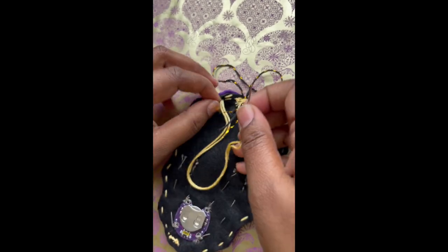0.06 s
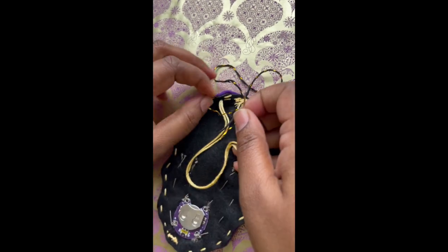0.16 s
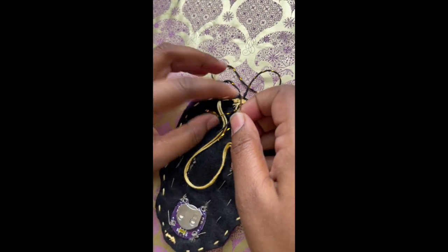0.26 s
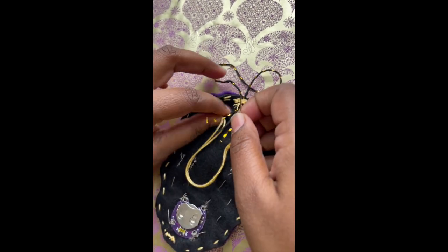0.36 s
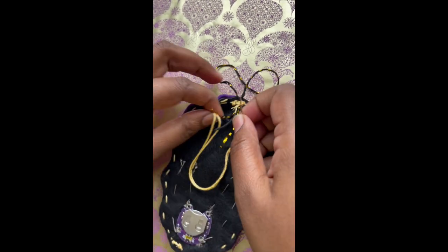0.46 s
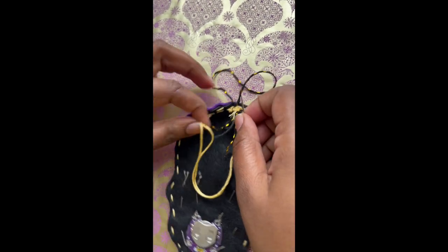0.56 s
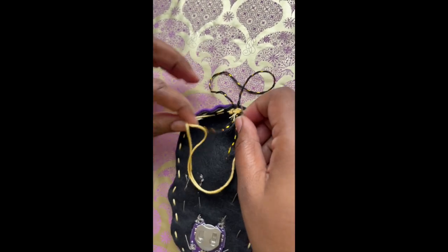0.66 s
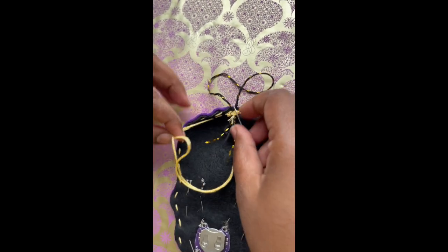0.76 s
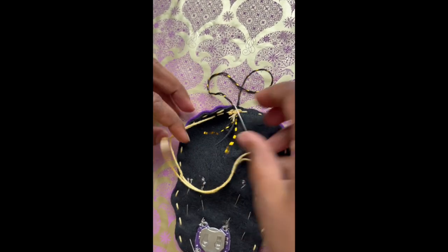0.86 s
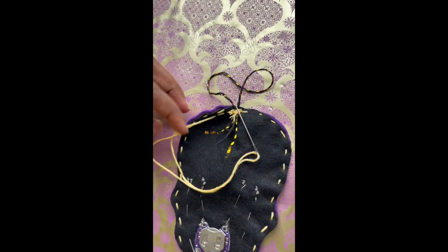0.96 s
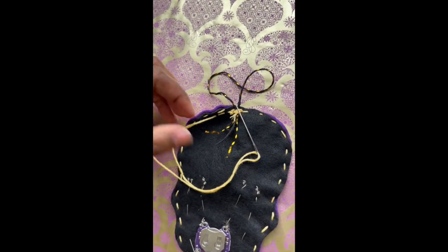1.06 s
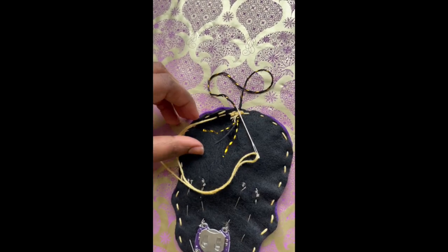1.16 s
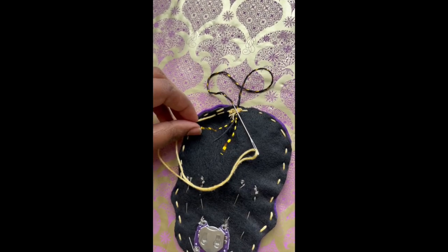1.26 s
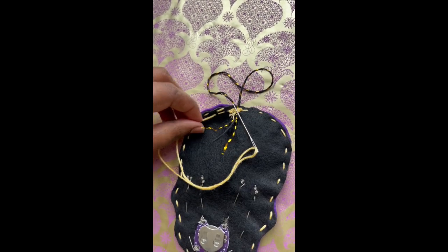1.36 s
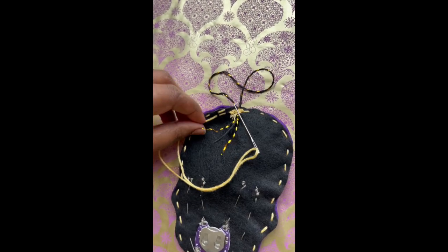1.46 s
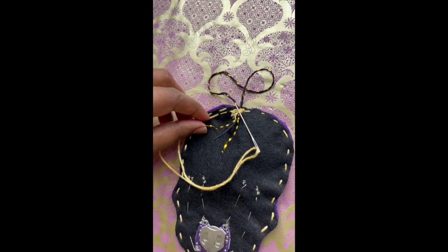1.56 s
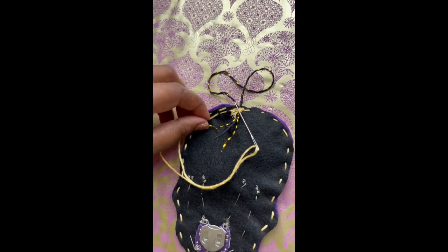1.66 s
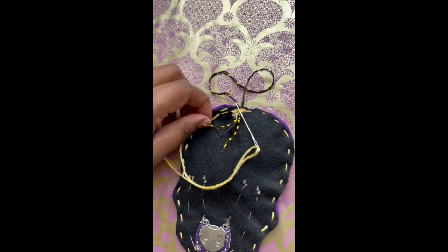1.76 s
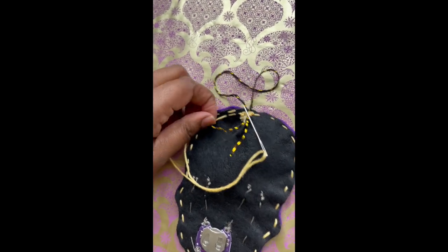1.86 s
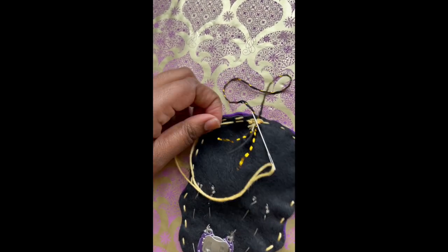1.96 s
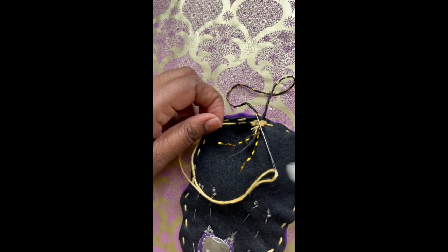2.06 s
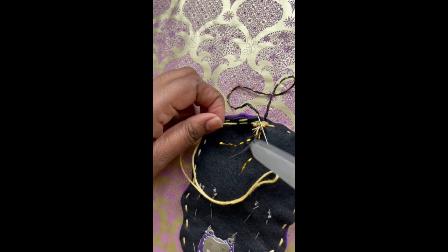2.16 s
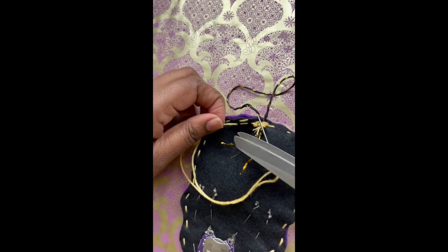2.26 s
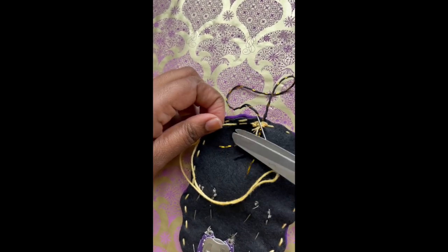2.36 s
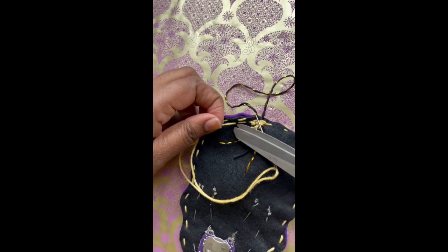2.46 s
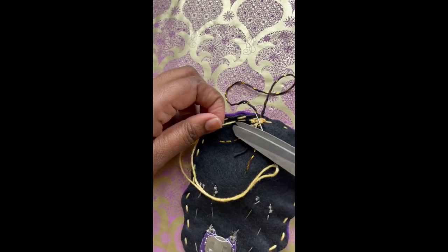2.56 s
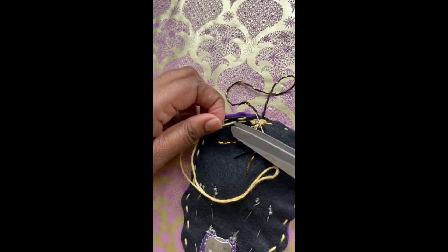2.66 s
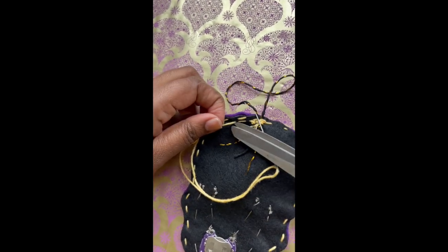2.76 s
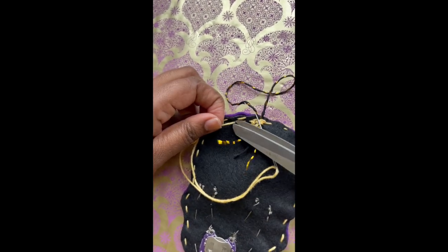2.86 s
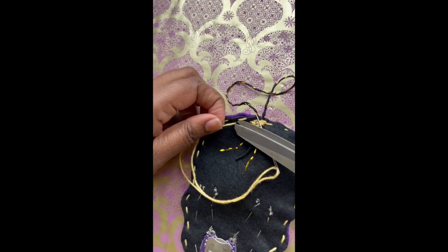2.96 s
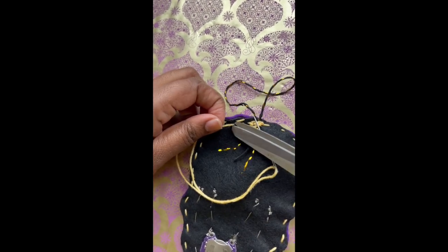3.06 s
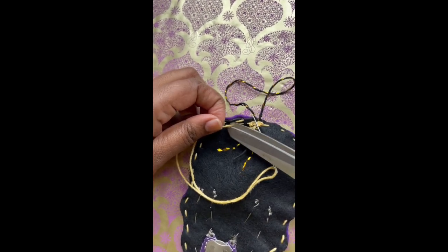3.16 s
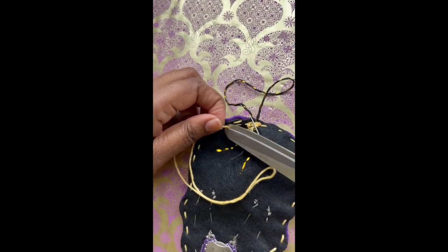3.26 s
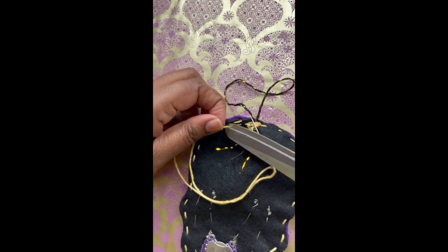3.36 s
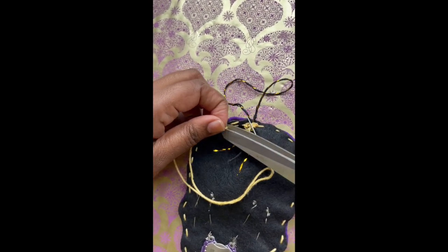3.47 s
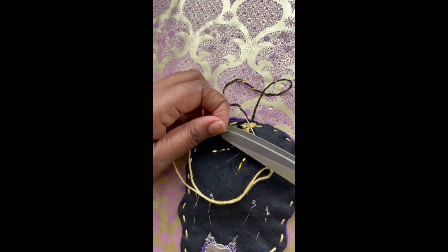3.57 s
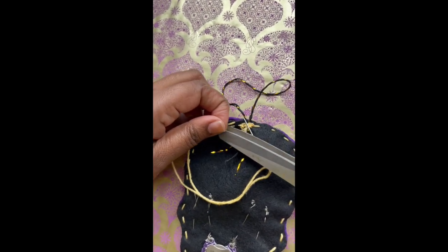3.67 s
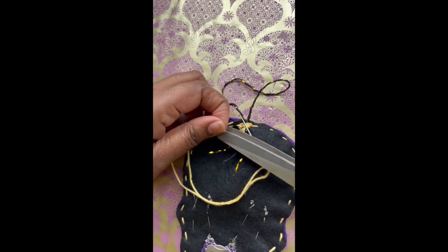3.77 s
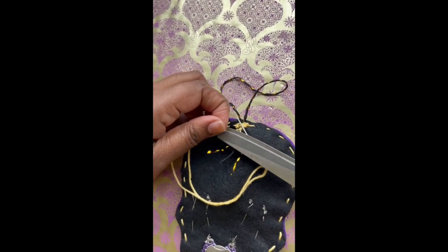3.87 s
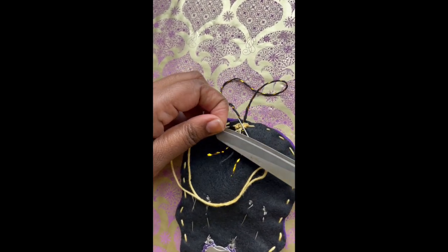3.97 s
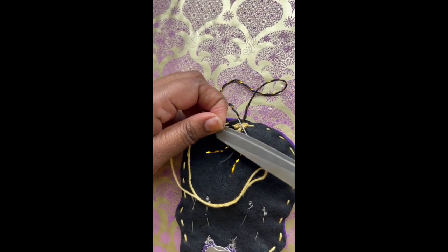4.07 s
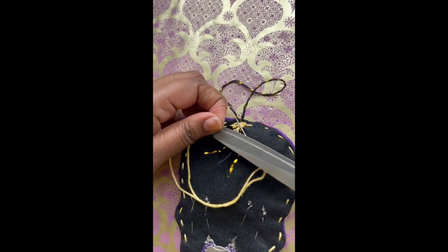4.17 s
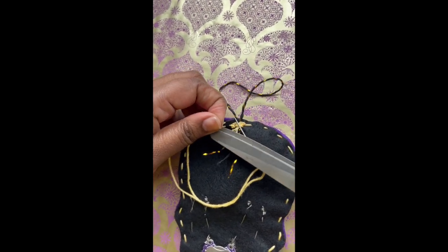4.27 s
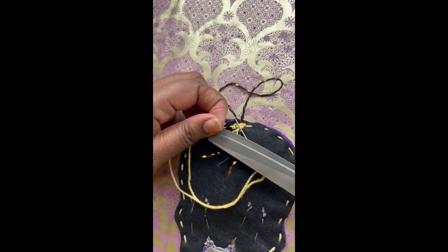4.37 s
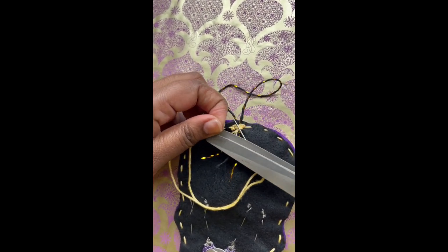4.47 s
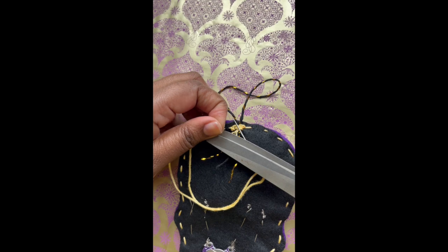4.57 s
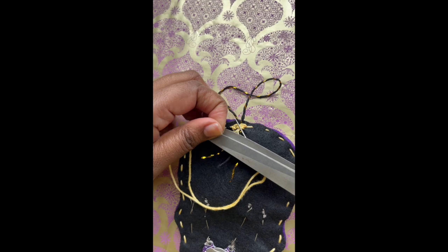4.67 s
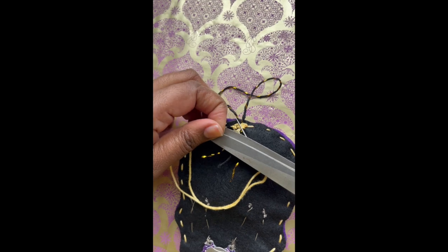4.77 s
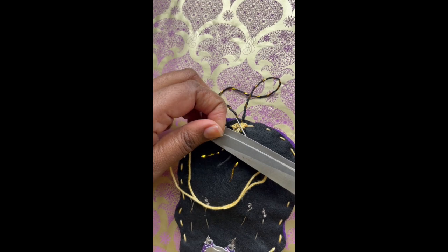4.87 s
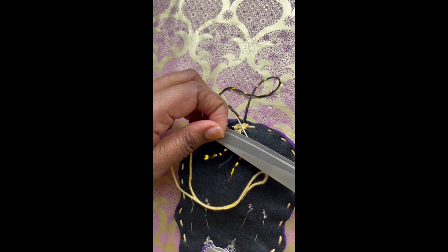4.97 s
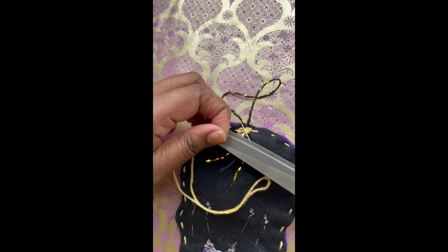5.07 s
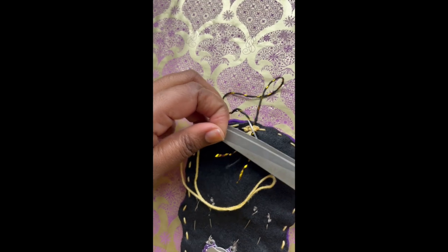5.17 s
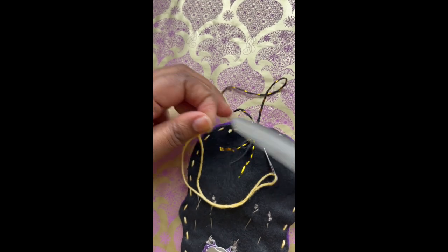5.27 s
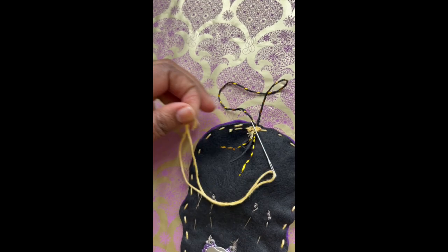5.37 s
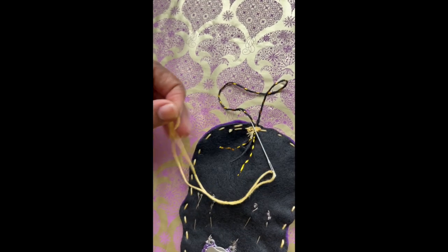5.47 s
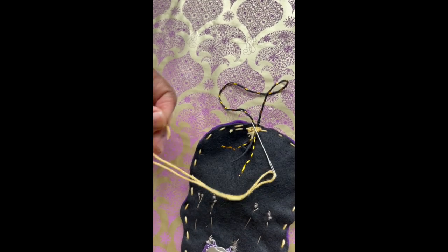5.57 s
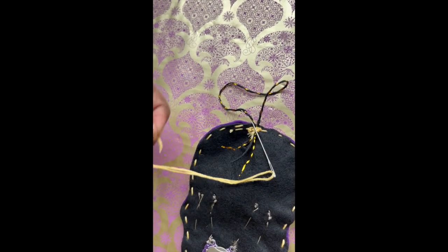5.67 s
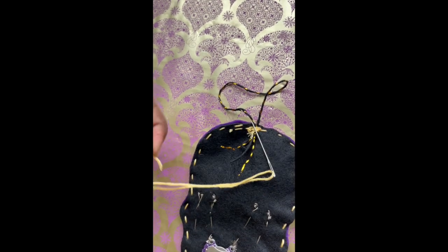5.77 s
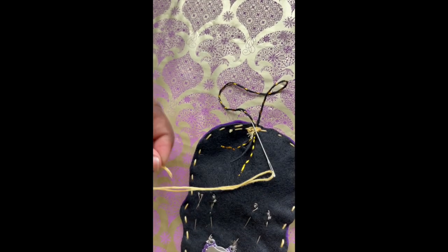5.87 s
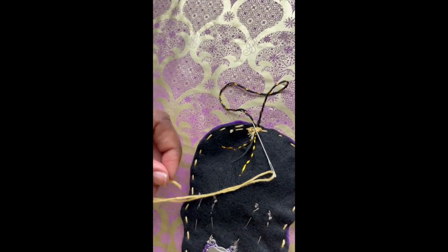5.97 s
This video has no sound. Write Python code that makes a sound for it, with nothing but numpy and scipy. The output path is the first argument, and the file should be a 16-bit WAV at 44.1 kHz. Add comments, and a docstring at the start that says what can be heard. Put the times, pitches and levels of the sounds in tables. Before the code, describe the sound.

Fingers rub and tap felt on a padded table, a single bright scissor snip follows, then scissors land with three booming, clattering knocks.

```python
"""Hand sewing on a cloth-covered table in a small, quiet room, close to a pair of microphones.
Fingers rub felt (filtered friction noise) with taps and ticks (damped resonances), pull thread through it,
then rub more softly. Scissors shear shut on the thread, scrape open again (swelling, bright friction),
and are put down in three clattering knocks (clacks with blade ring) that set the table booming (decaying
modes). Low room noise and a hum that fades to a lower level lie beneath."""
import sys
import numpy as np
from scipy import signal
from scipy.fft import rfft, irfft, next_fast_len
from scipy.io import wavfile
from scipy.ndimage import uniform_filter1d

SR = 44100
rng = np.random.default_rng(int(sys.argv[2]) if len(sys.argv) > 2 else 0)


def put_to_file(sound):
    """Save the sound as 16-bit audio at rate SR, in the file named by the first command-line argument."""
    columns = np.atleast_2d(sound).T  # one column per channel
    safe = np.clip(columns, -1, 1)
    whole_steps = np.round(safe * 32767)
    wavfile.write(sys.argv[1], SR, whole_steps.astype(np.int16))


N = 265951
TIME = np.arange(N) / SR


def amp(db):
    """Decibels to gain."""
    return 10 ** (np.asarray(db) / 20)


def unit(x):
    """Scales to rms 1."""
    return x / np.sqrt(np.mean(x ** 2) + 1e-20)


def read(points, hz):
    """Reads a spectrum on a log-frequency axis."""
    f, value = np.transpose(points)
    return np.interp(np.log(hz + 1), np.log(f + 1), value)


def over_time(points):
    """Draws a straight-line curve through (seconds, value) points."""
    return np.interp(TIME, *np.transpose(points))


def smooth_noise(size):
    """Slow random drift: averaged noise at rms 1."""
    return unit(uniform_filter1d(rng.standard_normal(N), size=size))


def add(mix, s, sound):
    """Mixes a sound in at time s."""
    part = mix[..., round(s * SR):][..., :sound.shape[-1]]
    part += sound[..., :part.shape[-1]]


def colour(x, points):
    """Causal minimum-phase filter with the given spectrum, so that attacks stay sharp."""
    size = 8192
    log_gain = np.log(amp(read(points, abs(np.fft.fftfreq(size, 1 / SR)))))
    response = np.exp(np.conj(signal.hilbert(log_gain)))
    taps = np.fft.ifft(response).real[:size // 2]
    return signal.fftconvolve(x, taps[None], axes=1)[:, :x.shape[1]]


def resonate(x, hz, width):
    """A resonance that follows the curve hz: shift down to 0 Hz, low-pass with a double pole, shift back."""
    turn = np.exp(2j * np.pi * np.cumsum(hz * np.ones(N)) / SR)
    r = np.exp(-np.pi * width / SR)
    return (turn * signal.lfilter([(1 - r) ** 2], [1, -2 * r, r * r], x / turn)).real


# Steady room noise. Each row: frequency in Hz, level in dB.
AIR_SPECTRUM = [(20, -25), (35, -8.5), (52, 6.5), (100, -8.5), (125, -5), (160, -4.5), (200, -13.5),
                (250, -14), (350, -23.5), (700, -28.5), (1300, -32), (1800, -27), (2600, -34.5),
                (16000, -43)]
# Fading hum. Each row: time in seconds, level in dB.
HUM_LEVEL = [(0, -59.5), (2.5, -60), (3.6, -64), (4.7, -70.5)]


def background():
    """Low room noise and the hum of a distant appliance, its pitch wavering slightly."""
    air = unit(colour(rng.standard_normal((2, N)), AIR_SPECTRUM))
    hum_hz = 85 + 0.59 * smooth_noise(15000)
    hum = unit(np.sin(2 * np.pi * np.cumsum(hum_hz) / SR))
    return amp(-64.5) * air + amp(over_time(HUM_LEVEL)) * hum


# Decay of the room. Each row: frequency in Hz, time to fall 60 dB in seconds.
ROOM_DECAY = [(100, 0.47), (500, 0.27), (1500, 0.24), (4000, 0.28), (8000, 0.22), (14000, 0.26)]
# Tone of the echoes. Each row: frequency in Hz, level in dB.
ECHO_SPECTRUM = [(60, 5), (200, -0.5), (500, 4), (1000, 3.5), (1700, -4.5), (2800, -0.5), (4500, 0),
                 (9000, 0), (15000, -6.5)]


def room(x):
    """Diffuse echoes of a small room: they build up quickly, and each band dies at its own speed."""
    hz, t, bands = signal.stft(rng.standard_normal((2, SR * 3 // 4)), SR, nperseg=256)
    decay = amp(-60 * t / read(ROOM_DECAY, hz)[:, None])
    tail = signal.istft(bands * decay, SR, nperseg=256)[1]
    build_s = 0.002
    tail *= 1 - np.exp(-(np.arange(tail.shape[1]) / SR / build_s) ** 2)
    tail = colour(tail / np.linalg.norm(tail[0]), ECHO_SPECTRUM)
    return signal.fftconvolve(x, tail, axes=1)[:, :N]


# Blows on the table, by hand and then by the scissors. Each row: start in seconds, thud level in dB,
# ring level in dB relative to the thud, ring tilt in dB an octave, pitch factor from the spot struck.
TABLE_BLOWS = [(.302, -57.5, 0.5, 8.5, 1.03), (0.804, -59.5, 7, 3.5, 0.91), (0.871, -49.5, 2, 7.5, 0.93),
               (1.262, -32.5, -2, -4, 1.086), (1.471, -41.5, -1, -0.5, 1.02), (1.626, -36, -6.5, 5.5, 0.98),
               (4.95, -57.5, -9, 0, 0.81), (5.37, -54, -1.5, 0.5, .88), (5.545, -21.5, -18.5, 9, 1.05),
               (5.667, -21.5, -8.5, 6.5, 1.05), (5.767, -18.5, -15, 8, 0.96)]
# Modes of the table top. Each row: frequency in Hz before the pitch factor, level in dB before the tilt,
# time to fall 60 dB in seconds.
TABLE_MODES = [(73.3, 4.5, 0.27), (94, 5.5, 0.24), (129.6, -4.5, 0.51), (160.9, -3.5, 0.15),
               (218.3, -13, 0.4), (246.3, -4, 0.15), (298.5, -6, 0.063), (356.2, -22, 0.19),
               (504, -27, 0.15), (563, -36, 0.21)]


def table():
    """Each blow bends the table top in one short thud, and its modes ring on at their own speeds."""
    out, t = np.zeros(N), np.arange(SR * 3 // 4) / SR
    thud_hz, peak_cycles, build_cycles = 100, 1.7, 0.82
    for s, db, ring_db, tilt_db, pitch in TABLE_BLOWS:
        cycles = thud_hz * pitch * t
        age = cycles / peak_cycles
        bend = (age * np.exp(1 - age)) ** 10
        add(out, s, -amp(db) * bend * np.sin(2 * np.pi * cycles))
        for hz, mode_db, t60 in TABLE_MODES:
            cycles = hz * pitch * t
            swell = 1 - np.exp(-(cycles / build_cycles) ** 2)  # low modes take longest to build up
            ring = amp(mode_db + tilt_db * np.log2(hz / thud_hz) - 60 * t / t60) * swell
            add(out, s, -amp(db + ring_db) * ring * np.sin(2 * np.pi * cycles))
    return np.array([out, out])


def friction(slips_per_s, spread_db, smooth, flutter_db, patchy_db):
    """Tiny random slips over a smooth hiss, under wavering pressure, with a patchy, shifting colour."""
    slip_sizes = amp(spread_db * np.minimum(rng.exponential(1, N), 4))
    slips = (rng.random(N) < slips_per_s / SR) * slip_sizes
    drift = uniform_filter1d(rng.standard_normal(N), size=400)
    pressure = amp(flutter_db * unit(uniform_filter1d(drift, size=300)))
    rub = (unit(slips) + smooth) * rng.standard_normal((2, N)) * pressure
    bands = signal.stft(rub, nperseg=256)[2]
    patches = uniform_filter1d(rng.standard_normal(bands.shape[1:]), size=6, axis=0)  # across frequency
    patches = unit(uniform_filter1d(patches, size=5, axis=1))  # across time
    return unit(signal.istft(bands * amp(patchy_db * patches), nperseg=256)[1][:, :N])


def stroke(start, length, db, swell_db, attack_s, release_s):
    """Gain of one sliding movement: it gets going, swells or eases steadily, then dies away."""
    t = np.maximum(TIME - start, 0)
    attack = np.sin(np.pi / 2 * np.minimum(t / attack_s, 1)) ** 2
    swell = amp(db + swell_db * (np.minimum(t / length, 1) - .5))
    release = np.exp(-np.clip((t - length) / release_s, 0, 20))
    return attack * swell * release


# Pulls of the thread. Each row: start in seconds, length in seconds, level in dB, swell in dB.
THREAD_PULLS = [(0.975, .085, -73.5, -17), (1.11, 0.036, -60, -6), (1.22, .04, -65, -4)]


def thread(drive):
    """Thread zips through the felt: friction through a fixed resonance."""
    gain = sum(stroke(*row, attack_s=0.0069, release_s=0.012) for row in THREAD_PULLS)
    return gain * unit(resonate(drive, hz=3330, width=750))


# Finger strokes over the felt. Each row: start in seconds, length in seconds, rasp level in dB and
# fibre hiss level in dB (both before their trims), swell from start to end in dB.
FELT_STROKES = [(.005, 0.22, -59, -67.5, 2.5), (0.249, 0.16, -62.5, -71, 1), (0.388, .17, -58.5, -64.5, 12),
                (0.604, 0.17, -60, -70, -3.5), (0.801, 0.082, -61, -66, 5.5), (1.073, 0.11, -56, -70, -6.5),
                (1.188, 0.077, -53.5, -62, 2.5), (1.288, 0.088, -58, -74.5, 15),
                (1.404, 0.068, -56.5, -67, 14.5), (1.502, 0.098, -58, -65, -4),
                (1.589, 0.09, -54.5, -59, 0), (1.681, 0.28, -61, -67, 0), (1.955, 0.14, -66.5, -74.5, -8),
                (2.146, 0.024, -71, -75.5, 3.5), (2.214, 0.11, -75, -81.5, 2),
                (2.403, 0.093, -70, -77.5, 9), (2.502, 0.04, -71, -85, 0),
                (2.575, 0.097, -69.5, -74.5, -0.5), (2.714, 0.025, -78, -84.5, 6),
                (2.837, 0.12, -74.5, -81, 2), (2.985, 0.13, -69.5, -81.5, -16),
                (3.12, 0.091, -67.5, -80.5, 13), (3.346, 0.13, -72.5, -78.5, 14),
                (3.543, 0.18, -78.5, -85.5, 0), (3.849, 0.12, -73, -88, -9), (4.006, 0.086, -71, -82.5, 8),
                (4.124, 0.035, -78.5, -84, 3), (4.246, 0.16, -75, -78.5, 0.5),
                (4.567, 0.1, -75.5, -81.5, 8.5), (4.696, 0.24, -83.5, -91.5, -10),
                (4.951, 0.1, -69, -71, -12), (5.071, .105, -68.5, -74.5, 8), (5.193, .14, -75.5, -83, 11.5)]
# Centre of the rasp. Each row: time in seconds, frequency in Hz.
RASP_CENTRE = [(0, 1800), (.55, 2240), (.8, 2110), (1.1, 1850), (2, 1894), (5.5, 1726)]
# Hiss of the fibres. Each row: frequency in Hz, level in dB.
HISS_SPECTRUM = [(100, -15.5), (400, -16.5), (700, -34), (1200, -7.5), (2600, -0.5), (4000, -2.5),
                 (6000, 0.5), (7500, 1.5), (9500, 3), (11000, -1), (12800, -4.5), (14500, -5), (16000, -21)]
# Coarse scratch of the firm drag. Each row: frequency in Hz, level in dB.
SCRATCH_SPECTRUM = [(100, 8.5), (300, -1), (550, -16), (750, -6.5), (1150, -4.5), (1800, -6.5), (2600, 1.5),
                    (3600, 0), (5000, -4), (7000, -23.5), (16000, -19.5)]
# The scratch outgrows the rasp as fingers press harder: firm rasp dB, scratch dB there, scratch dB per rasp dB.
FIRM_DB, SCRATCH_DB, SCRATCH_GROWTH = -56, -55.5, 2.09


def cloth():
    """Rubbed felt: a hollow rasp, fibre hiss, a coarse scratch under firm fingers, and the thread."""
    rasp_gain, hiss_gain, scratch_gain = np.zeros((3, N))
    for start, length, rasp_db, hiss_db, swell_db in FELT_STROKES:
        motion = stroke(start, length, 0, swell_db, attack_s=0.027, release_s=0.011)
        rasp_gain += amp(rasp_db) * motion
        hiss_gain += amp(hiss_db) * motion
        scratch_gain += amp(SCRATCH_DB + SCRATCH_GROWTH * (rasp_db - FIRM_DB)) * motion
    drive = friction(slips_per_s=830, spread_db=1.5, smooth=1.5, flutter_db=1.7, patchy_db=2.6)
    rasp = unit(resonate(drive, over_time(RASP_CENTRE), width=556))
    fine = friction(slips_per_s=1500, spread_db=0.5, smooth=2.3, flutter_db=1.9, patchy_db=1.54)
    hiss = unit(colour(fine, HISS_SPECTRUM))
    coarse = friction(slips_per_s=380, spread_db=5, smooth=1.1, flutter_db=1.2, patchy_db=3)
    scratch = unit(colour(coarse, SCRATCH_SPECTRUM))
    rubbing = amp(1.5) * rasp_gain * rasp + amp(7.5) * hiss_gain * hiss + scratch_gain * scratch
    return rubbing + thread(drive)


# Broad snap of a contact. Each row: frequency in Hz, level in dB.
SNAP_SPECTRUM = [(60, -37), (300, -1), (600, 1.5), (1500, 0.5), (4500, -1.5), (8500, -11), (10500, -12),
                 (14000, -18), (16000, -6)]


def contact(db, hz, q, snap_db, scatter, scatter_s):
    """An impulse with a little fine grit passes one damped resonance; a brief broad crunch goes with it."""
    t = np.arange(SR // 8) / SR
    grit = rng.standard_normal((2, len(t))) * np.exp(-t / scatter_s) * np.sqrt(t)
    grit /= np.linalg.norm(grit[0])
    fine = signal.lfilter(*signal.butter(1, 2500, "highpass", fs=SR), grit)
    push = (t == 0) + scatter * fine
    body = signal.lfilter(*signal.iirpeak(hz, q, SR), push)
    # the finite time of contact rounds off the treble
    body = signal.lfilter(*signal.butter(2, min(3 * hz, 8500), fs=SR), body)
    return amp(db) * (body + amp(snap_db) * colour(grit, SNAP_SPECTRUM))


# Small ticks and taps. Each row: start in seconds, level in dB, centre in Hz, sharpness Q,
# broad snap in dB relative to the level.
SMALL_TICKS = [(0.1492, -13.5, 1880, 3.3, -16), (.2955, -18.5, 2240, 3.3, -6), (0.302, -7, 420, 8.9, -31),
               (0.8004, -1, 2130, 7.2, -15.5), (0.808, -8, 230, 3, -40), (0.8447, -7.5, 2050, 4.3, -17),
               (.875, -16, 284, 0.96, -2), (0.931, -22, 1080, 2.1, -10.5), (.985, -15, 3570, 3.4, -25),
               (1.0678, -36, 3330, 3.9, 6), (1.0968, -15, 1670, 3.5, -15), (1.115, -19.5, 3850, 1, -25),
               (1.2068, -11, 1670, 3.6, -24), (1.1682, -9.5, 1670, 2.9, -40), (1.264, 4, 327, 10, -42),
               (1.432, -20, 2030, 1.8, -12), (1.6249, -13.5, 3900, 0.77, -11), (1.63, -4, 335, 3.3, -36),
               (1.659, -21, 2030, 4.9, 6), (2.2364, -23, 1800, 8.4, -18), (2.339, -22.5, 1820, 9.9, -19),
               (2.5984, -31, 8700, 3.2, -20), (2.941, -45, 8000, 1.6, -19), (2.985, -28, 1880, 4.8, -16),
               (3.006, -27, 1960, 4.7, -16), (5.2235, -27, 9500, 5, -7.5), (5.3215, -29, 1680, 3.9, -5.5)]


def ticks():
    """Needle, thread and fingertips catch, let go and tap the cloth."""
    out = np.zeros((2, N))
    for s, db, hz, q, snap_db in SMALL_TICKS:
        add(out, s, contact(db, hz, q, snap_db, scatter=0.4, scatter_s=0.0027))
    return out


# Edge sliding on edge, once to close and then in short slips to open. Each row: start in seconds,
# length in seconds, level in dB, swell in dB, sizzle in dB relative to the rest of the scrape.
EDGE_SLIDES = [(3.736, 0.073, -57, 33, 10), (4.86, 0.03, -63, 11.5, 5), (4.923, 0.025, -52.5, 18, 0),
               (4.952, 0.068, -66, -2, -4)]
# Colour of the sliding edges. Each row: frequency in Hz, level in dB.
EDGE_SPECTRUM = [(300, -27), (1200, -14.5), (2000, -1.5), (4200, -5), (5100, 3.5), (5650, -3.5), (6050, 5),
                 (6550, 5.5), (7300, -14), (8400, 1), (9500, -9.5), (10400, 0), (13800, -8), (16000, -13.5)]
SIZZLE_HZ = 10970  # the sizzle lies above this


def edges():
    """The edges scrape along each other: a bright sizzle as they close on the thread, duller as they open."""
    steel = friction(slips_per_s=2500, spread_db=2.5, smooth=.8, flutter_db=.8, patchy_db=2.2)
    scrape = unit(colour(steel, EDGE_SPECTRUM))
    sizzle = signal.sosfiltfilt(signal.butter(2, SIZZLE_HZ, "highpass", fs=SR, output="sos"), scrape)
    out = np.zeros((2, N))
    for start, length, db, swell_db, sizzle_db in EDGE_SLIDES:
        slide = stroke(start, length, db, swell_db, attack_s=0.0052, release_s=.004)
        out += slide * (scrape - sizzle + amp(sizzle_db) * sizzle)
    return out


# Hard contacts of the scissors. Each row: start in seconds, level in dB, centre in Hz, sharpness Q,
# broad snap in dB relative to the level, blade ring in dB relative to the level.
SCISSOR_CLACKS = [(3.8073, 2, 2550, 5, -26, -6), (3.8082, 3, 4600, 5, -22, -6),
                  (3.809, -9, 760, 6, -28, -26), (3.8103, -5, 3300, 3, -18, -8),
                  (4.9505, -17, 2500, 3, -12, -14), (4.952, -24, 720, 4, -20, -25),
                  (5.54, -19, 9000, 1, -4, -18), (5.543, 17, 1560, 2.3, -27, -33),
                  (5.5445, 8, 650, 4, -28, -38), (5.5532, -8, 6000, 1.4, -14, -20),
                  (5.5557, -5, 6500, 1.4, -14, -20), (5.651, -19, 5000, 1, -5, -14),
                  (5.667, 1, 2800, .8, -7, -20), (5.6675, 7, 500, 3, -30, -35),
                  (5.7668, 8, 1050, 2.5, -10, -28), (5.7678, 2, 3200, 1, -12, -18),
                  (5.7725, -5, 2200, 1, -10, -20), (5.774, 8, 340, 3, -35, -40),
                  (5.7805, -9, 7000, 1.4, -9, -20), (5.7918, -6, 1500, 1, -12, -20)]
# Ring of the blades. Each row: frequency in Hz, level in dB, time to fall 60 dB in seconds.
BLADE_MODES = [(2550, -67, .05), (2500, -61, .08), (3640, -60, .12), (4350, -44.5, 0.042),
               (4880, -66.5, .09), (5970, -56.5, .08), (6860, -60.5, .05), (10350, -60, .04),
               (11500, -68.5, .04), (13600, -57, .04)]


def scissors():
    """Each hard contact clacks and briefly rings the hand-damped blades."""
    out, t = np.zeros((2, N)), np.arange(SR // 3) / SR
    for s, db, hz, q, snap_db, ring_db in SCISSOR_CLACKS:
        add(out, s, contact(db, hz, q, snap_db, scatter=1.0, scatter_s=0.0014))
        for mode_hz, mode_db, t60 in BLADE_MODES:
            phase = rng.random((2, 1))  # in cycles, one for each side
            ring = amp(mode_db - 60 * t / t60) * np.sin(2 * np.pi * (mode_hz * t + phase))
            add(out, s, amp(db + ring_db) * ring)
    return out


# The scissors cut near the microphones and are put down farther off.
# Each row: time in seconds, level of their echoes in dB.
STEEL_ECHO = [(5.2, -10), (5.5, -5.5)]


def scene():
    """Everything on the table, with the room around it."""
    felt, small, steel, wood = cloth(), ticks(), edges() + scissors(), table()
    steel_echo = amp(over_time(STEEL_ECHO))
    echoes = room(amp(-8.0) * felt + amp(-3.5) * small + steel_echo * steel + amp(-9.0) * wood)
    return felt + small + steel + wood + echoes + background()


# Phase by which the left microphone leads. Each row: frequency in Hz, phase in radians.
PORT_PHASE = [(0, 0), (700, -1.1), (1200, -.9), (1750, 0), (2700, 2.2), (4400, 2), (5000, 1.4), (5900, 3.1),
              (6150, 3.2), (7700, 6.2), (8300, 6.35), (10000, 9.35), (10500, 9.5), (12100, 12.5),
              (13000, 12.7), (14400, 15.6), (15200, 15.8), (16000, 16.5)]
CUT_HZ = 15850  # top of the band


def record(dry):
    """Two microphone ports: a phase between them, most alike in or out of step; then the band limit."""
    size = next_fast_len(N + SR // 4)
    hz = np.fft.rfftfreq(size, 1 / SR)
    left, right = rfft(dry, size)
    phase = np.interp(hz, *np.transpose(PORT_PHASE))
    base_spread = read([(100, .2), (1800, 0.17), (6000, 0.039), (10000, 0.029)], hz)
    spread = np.clip(base_spread + 0.73 * np.sin(phase) ** 2, 0, 1)
    common, apart = (left + right) / 2, spread * (left - right) / 2
    ports = np.array([(common + apart) * np.exp(1j * phase), common - apart])
    ports *= np.sqrt(2 / (1 + spread ** 2))  # makes up the level lost by narrowing
    left_db = [(60, -1), (1500, -1), (2600, -3), (3300, -.5), (4600, -3), (6000, -.2)]
    ports[0] *= amp(read(left_db, hz))
    low_pass = np.clip((CUT_HZ - hz) / 200 + .5, 0, 1)
    return amp(-4.0) * irfft(ports * low_pass, size)[:, :N]


dry = scene()
out = record(dry)
put_to_file(out)
```